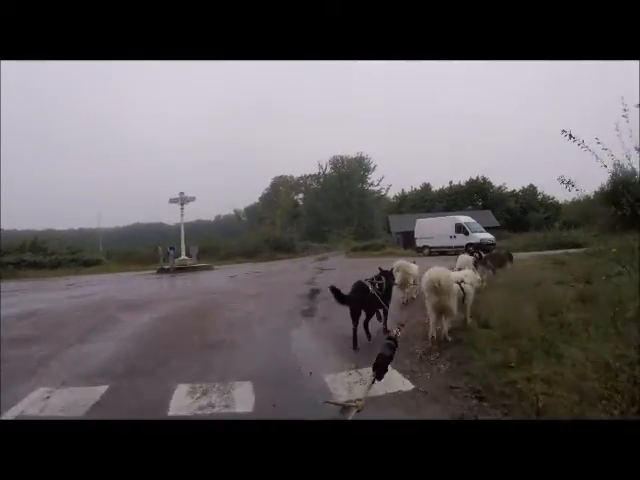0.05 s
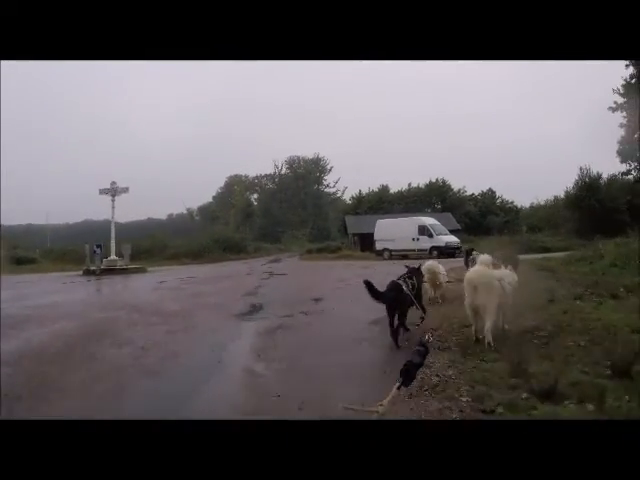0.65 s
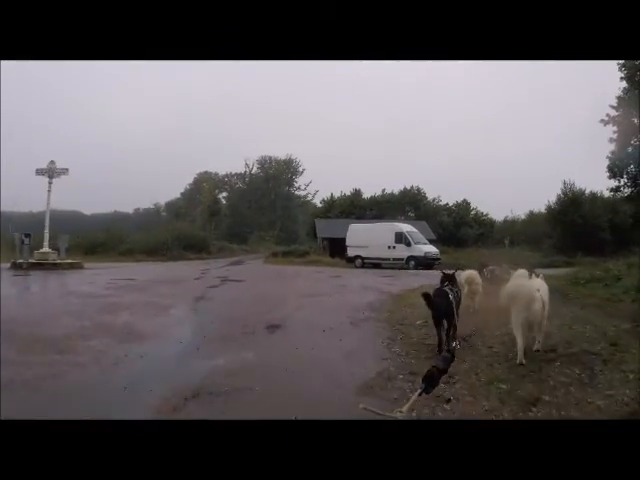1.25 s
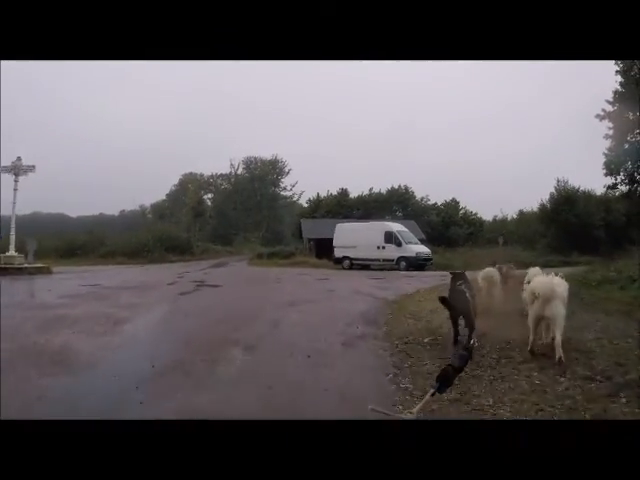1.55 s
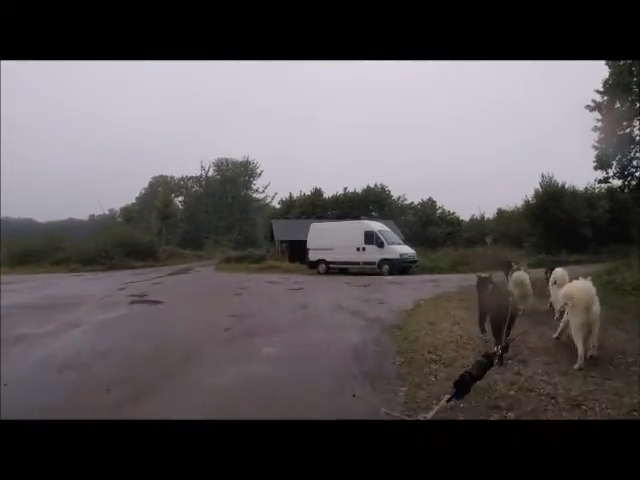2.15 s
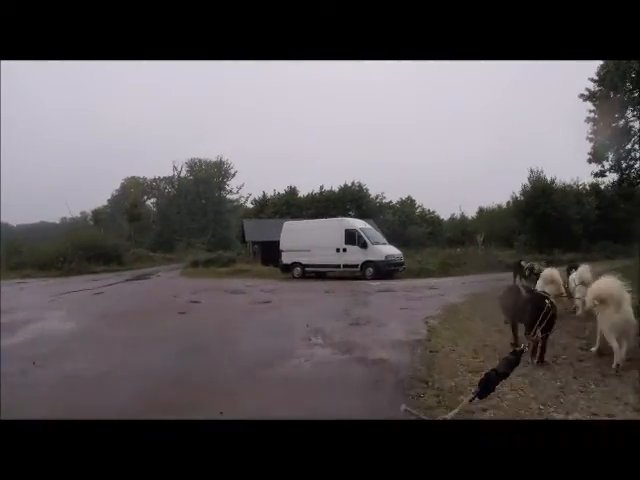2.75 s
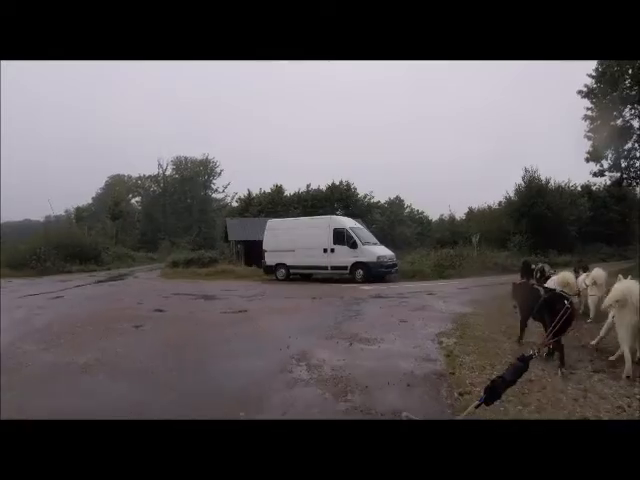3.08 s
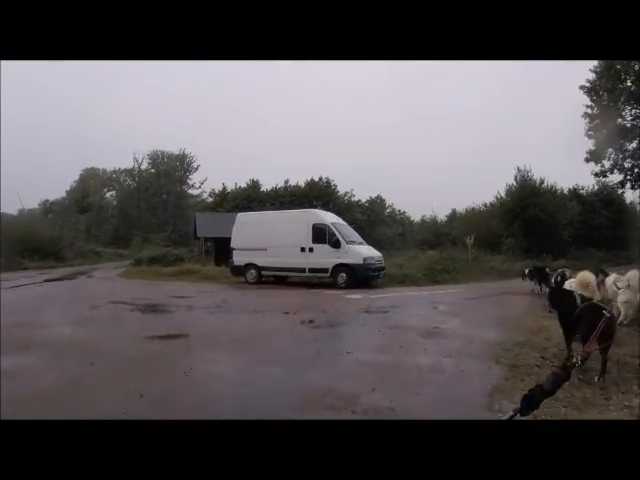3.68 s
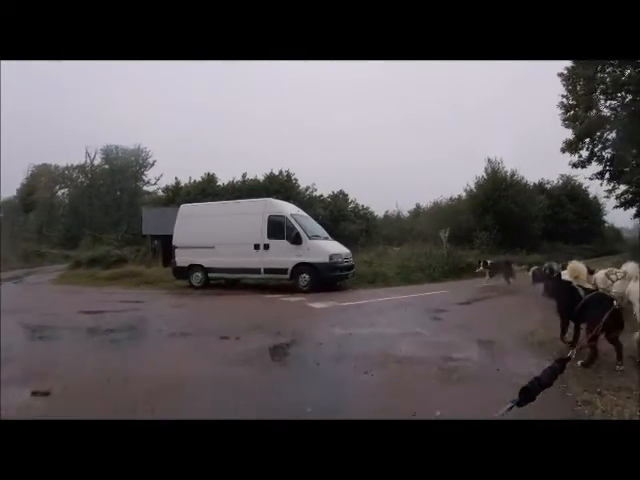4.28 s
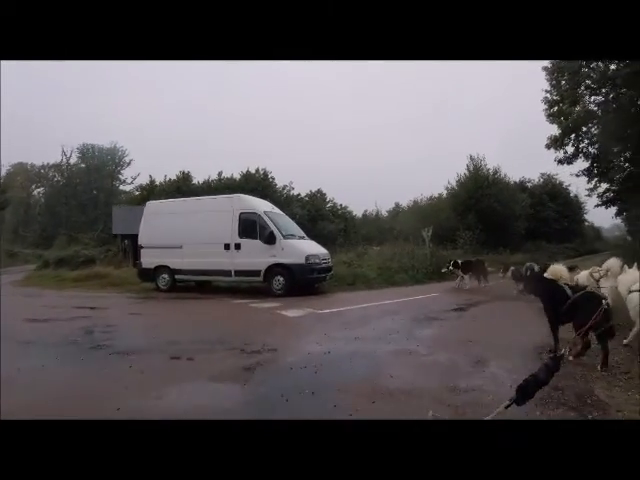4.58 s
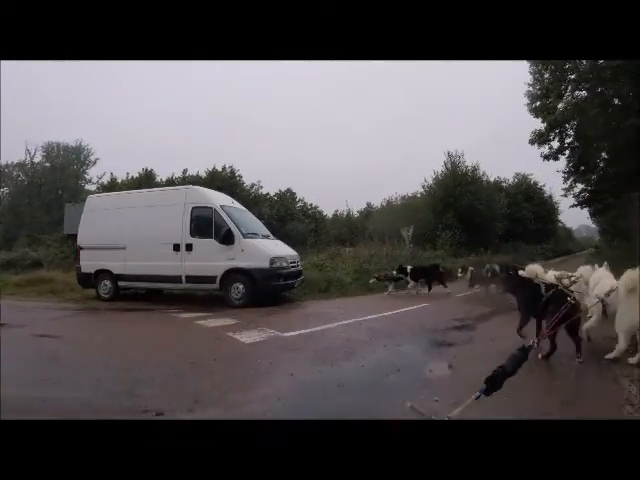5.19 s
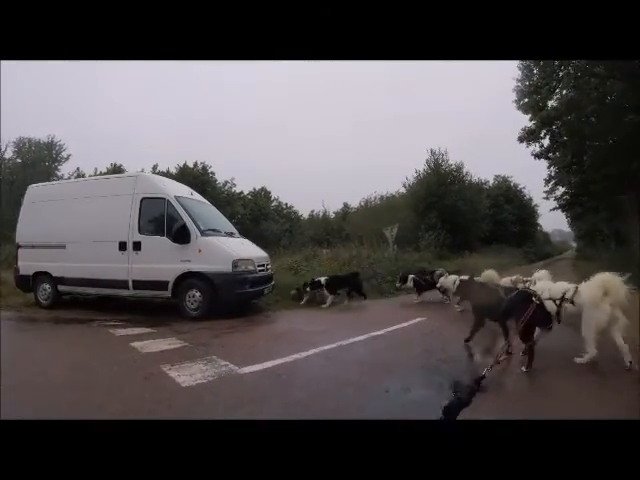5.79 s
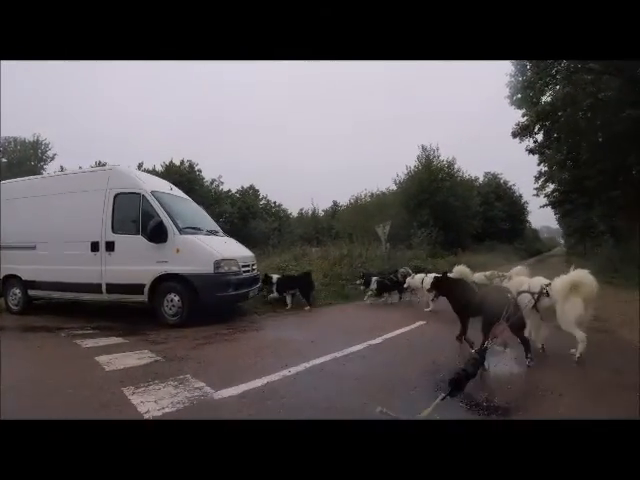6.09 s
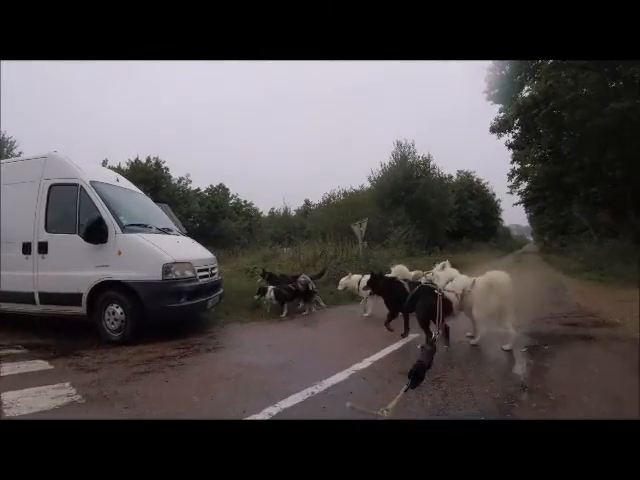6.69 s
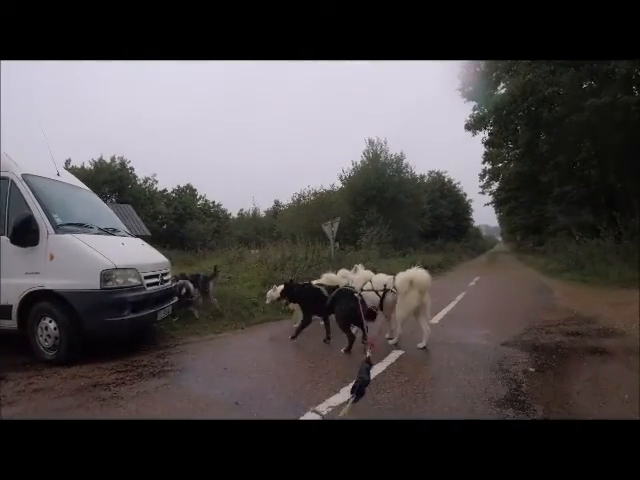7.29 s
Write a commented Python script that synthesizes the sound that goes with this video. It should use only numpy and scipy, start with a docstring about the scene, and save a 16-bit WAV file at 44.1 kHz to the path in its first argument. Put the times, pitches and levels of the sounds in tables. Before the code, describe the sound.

Heard close up from on board, a rolling cart throbs deeply and rattles throughout on a wet outdoor road. Bumps make its loose joints knock and clank, often in quick clusters, and its body occasionally booms. Just below, wheels and dogs' paws crunch through damp grit with sharp stone clicks and a fine hiss. Later the ride gets smoother, with a faint spatter of water and some last hard knocks.

```python
"""A deep throb and a rattling frame, close up: the microphone rides on a training cart that a dog team
pulls along the gritty edge of a wet road. The tyres shake the frame into the throb, road bumps keep it
rumbling, and jolts make loose joints knock and clank and the body boom. Just below, wet grit crunches
and snaps under wheels and paws; near the end, droplets spatter off bare tarmac."""
import sys
import numpy as np
from scipy import signal
from scipy.fft import rfft, irfft
from scipy.io import wavfile
from scipy.ndimage import uniform_filter1d, minimum_filter1d

SR = 44100
rng = np.random.default_rng(int(sys.argv[2]) if len(sys.argv) > 2 else 0)


def transcribe(signal):
    """Save signal, clipped to [-1, 1], as a 16-bit WAV file at the path in sys.argv[1]."""
    frames = np.atleast_2d(signal).T
    limited = np.clip(frames, -1, 1)
    pcm = np.round(limited * 32767).astype(np.int16)
    wavfile.write(sys.argv[1], SR, pcm)


N = 328280
TIME = np.arange(N) / SR

# ground under the wheels: time_s, crunch_db, spray_db
GROUND = [(0.42, -44, -61.5), (1.33, -33, -54), (1.7, -41.5, -59), (2.07, -40.5, -56), (2.47, -41, -63.5),
          (3.33, -38, -59), (3.79, -44, -60), (4.06, -37.5, -58.5), (4.26, -45, -61.5), (4.57, -37, -59.5),
          (5.26, -49, -62), (6.14, -43, -58), (7.05, -42, -61), (7.38, -44, -60)]
# spectrum of a stone's bright tick: frequency_hz, level_db
TICK_SPECTRUM = [(800, -30), (2500, -11.5), (4800, 9), (6700, 6), (8200, -4.5), (11000, -5), (12200, -19.5),
                 (13500, -12), (15000, -30.5)]
# spectrum of a stone's low crack: frequency_hz, level_db
CRACK_SPECTRUM = [(400, -16.5), (1200, 8), (2000, 3.5), (2800, -3), (3800, -7), (6000, -15), (11000, -43),
                  (14000, -82)]
# jolts that hit the frame: start_s, soft_db, hard_db, ring_db (relative to hard_db)
JOLTS = [(0.3468, 3, 11.5, -8), (0.785, 18, -1, 1), (1.181, 16.5, 7, -5), (1.2745, 19, 1, -20),
         (1.3092, 12, 3, -17), (1.5259, -7, 8.5, -19), (1.7047, -4, 9, 5), (1.91, 17.5, 1.5, 11),
         (1.9649, 18.5, 8, -4), (2.2868, 9, 6, 5), (2.5105, 12.5, 10, -9), (3.062, 14, -11, -15),
         (3.2233, 18.5, 9.5, 1), (3.4239, 1, -8, -12), (3.5818, -1, 5, 9.5), (3.7958, 12.5, -14, 3),
         (3.888, 13, 7, -1), (4.0338, 12.5, 0.5, 13), (4.112, 10, 8.5, 2), (4.2601, 12, 3, -10),
         (4.3135, -9, 7.5, -30), (4.4187, 17, 10, -20), (4.4434, 6, -2, 7), (5.3146, 12.5, 5, 12),
         (5.6385, 0, 4, 8), (5.786, 17, 2, 6), (5.8835, 8, 0.5, 8), (6.0435, -5, 5.5, -15),
         (6.1588, 12, 2.5, -6), (6.2314, 19, 2, -4), (6.249, 14, 9, -24), (6.7467, 12.5, 14.5, -18),
         (6.7884, 13, 10.5, -4), (6.8006, -10, 7.5, -5), (7.0675, 10, 0, -2)]
# ring of the frame: pitch_hz, t60_s, level_db
FRAME_MODES = [(181, 0.12, 0.5), (228.7, 0.18, 6), (259, 0.16, -10), (342.4, 0.19, -9), (416.8, 0.11, 5),
               (538.8, 0.091, 6), (623, 0.028, 1.5), (1058, 0.15, -21)]
# ring of a loose fitting: pitch_hz, t60_s, level_db
FITTING_MODES = [(1037, 0.028, -4), (1165, 0.031, -6.5), (1332, 0.023, -6.5), (1384, 0.043, -6),
                 (1518, 0.046, -6)]
# deep ring of the cart's body: pitch_hz, t60_s, level_db
BODY_MODES = [(176.6, 0.21, -6.5), (232.2, 0.37, -3.5), (323, 0.14, 2)]


def amp(db):
    """Decibels to gain."""
    return 10 ** (np.asarray(db) / 20)


def unit(x):
    """Scales to an rms of 1."""
    return x / np.sqrt(np.mean(x ** 2) + 1e-20)


def curves(rows):
    """One curve for each column after the time, with a value for every sample."""
    time_s, *columns = np.transpose(rows)
    return [np.interp(TIME, time_s, column) for column in columns]


def add(mix, start_s, sound):
    """Mixes a sound in at start_s."""
    part = mix[max(round(start_s * SR), 0):][:len(sound)]
    part += sound[:len(part)]


def wander(rate_hz):
    """Smooth random drift of rms 1, mostly slower than rate_hz."""
    hz = np.fft.rfftfreq(N, 1 / SR)
    return unit(irfft(rfft(rng.standard_normal(N)) * np.exp(-(hz / rate_hz) ** 2), N))


def colour(x, spectrum, size=4096):
    """Minimum-phase filter of energy 1 with the given spectrum: clicks keep their sharp front."""
    hz, db = np.transpose(spectrum)
    bin_hz = abs(np.fft.fftfreq(size, 1 / SR))
    log_gain = np.log(amp(np.interp(np.log(bin_hz + 1), np.log(hz), db)))
    response = np.fft.ifft(np.exp(np.conj(signal.hilbert(log_gain)))).real[:size // 2]
    return signal.oaconvolve(x, response / np.linalg.norm(response))[:len(x)]


def impacts(per_s, spread_db):
    """Random clicks of either sign, mostly small and a few large."""
    size = amp(spread_db * np.minimum(rng.exponential(1, N), 4))
    return size * rng.choice([-1, 1], N) * (rng.random(N) < per_s / SR)


def steady(x, span_s):
    """Holds the rms near 1 over span_s and keeps the faster grain."""
    span = int(span_s * SR)
    power = uniform_filter1d(uniform_filter1d(x ** 2, span), span)
    return x / np.sqrt(abs(power) + 1e-12)


def resonate(force, modes, top_hz):
    """A force rings a part's dying modes; its rubbery mount rolls off the sound above top_hz."""
    t = TIME[:SR // 3]
    ring = sum(amp(db - 60 * t / t60_s) * np.sin(2 * np.pi * hz * t) * (-1) ** k
               for k, (hz, t60_s, db) in enumerate(modes))
    ring = signal.sosfilt(signal.butter(5, top_hz, fs=SR, output="sos"), ring)
    return signal.oaconvolve(force, ring / np.linalg.norm(ring))[:N]


def padded_blows(blows, modes, focus_octaves, contact_s):
    """Each blow builds over the contact time, favours the mode nearest its pitch and is tuned to it."""
    t, out = TIME[:SR // 4], np.zeros(N)
    hz, t60_s, mode_db = np.transpose(modes)[:, :, None]
    for start_s, peak_db, lead_hz in blows:
        ratio = hz / hz[np.argmin(abs(hz - lead_hz))]
        share = 1 / np.hypot(1, np.log2(ratio) / focus_octaves)
        partials = share * amp(mode_db - 60 * t / t60_s) * np.sin(2 * np.pi * lead_hz * ratio * t)
        ring = partials.sum(0) * (1 - np.exp(-(t / contact_s) ** 2))
        add(out, start_s - contact_s / 2, amp(peak_db) * ring / abs(ring).max())
    return out


def spatter(per_s, spread_db):
    """Paws and tyres fling droplets off the wet tarmac."""
    # the team reaches bare tarmac: time_s, level_db
    puddles = [(6.2, -87), (6.6, -58), (7.4, -61.5)]
    # spectrum of the droplets: frequency_hz, level_db
    droplet_spectrum = [(3500, -6.5), (4800, 0), (10500, -11.5), (11800, -19), (15000, -24.5)]
    level_db, = curves(puddles)
    return amp(level_db) * unit(colour(impacts(per_s, spread_db), droplet_spectrum))


def chips(per_s, spread_db, tick_db, crack_db):
    """Small stones click at random, louder where the ground is gritty."""
    grit_db, _ = curves(GROUND)
    snaps = amp(grit_db) * impacts(per_s, spread_db)
    return amp(tick_db) * colour(snaps, TICK_SPECTRUM) + amp(crack_db) * colour(snaps, CRACK_SPECTRUM)


def grit_levels(crunch_db, spray_db, rise_share=0.46):
    """Crunch and spray in dB: the ground's running share plus a swell for each scuff."""
    # a wheel or paw scuffs through wet grit: start_s, length_s, crunch_db, spray_db
    scuffs = [(0.588, 0.14, -49, -70), (1.102, 0.13, -42, -58), (1.242, 0.086, -40.5, -56),
              (1.723, 0.12, -43.5, -59), (2.402, 0.084, -58, -50.5), (3.219, 0.1, -46, -51),
              (3.483, 0.13, -48, -49), (3.569, 0.071, -42.5, -56), (3.857, 0.089, -51, -46.5),
              (4.063, 0.058, -40.5, -48), (4.207, 0.072, -43, -51), (5.105, 0.039, -56, -48.5),
              (5.89, 0.09, -67, -46.5), (6.566, 0.16, -53, -61), (6.947, 0.13, -45, -64),
              (7.079, 0.096, -50, -55), (7.191, 0.051, -43.5, -52.5), (7.341, 0.11, -48.5, -58)]
    power = amp(np.array(curves(GROUND)) + [[crunch_db], [spray_db]]) ** 2
    for start_s, length_s, *levels_db in scuffs:
        swell = np.interp(np.arange(0, length_s, 1 / SR), [0, rise_share * length_s, length_s], [0, 1, 0])
        for layer, db in zip(power, levels_db):
            add(layer, start_s, (amp(db) * np.sin(np.pi / 2 * swell)) ** 2)
    return 10 * np.log10(power)


def grit_clumps(per_s, decay_s, bed):
    """Strength of grit bursting from under the tread: sudden, dying clumps over a steady bed."""
    power = signal.lfilter([1], [1, -np.exp(-1 / (decay_s * SR))], impacts(per_s, spread_db=3.0) ** 2)
    return np.sqrt(bed + power / power.mean())


def grains(low_hz, high_hz, spread_db, cycles, count):
    """Single grains of grit, each dying within a few cycles of its own pitch."""
    t, out = TIME[:SR // 60], np.zeros(N)
    for when, pitch, size in rng.random((count, 3)):
        hz = low_hz * (high_hz / low_hz) ** pitch
        db = spread_db * min(-np.log(size), 4)
        add(out, when * TIME[-1], amp(db) * np.sin(2 * np.pi * hz * t) * np.exp(-t * hz / cycles))
    return out


def mottle(x, depth_db, width_hz, length_s):
    """Every wet splat has its own colour: random patches of the spectrum stand out and sink again."""
    hz, t, spectra = signal.stft(x, SR, nperseg=256, noverlap=192)
    patches = rng.standard_normal(spectra.shape[::-1])
    for _ in range(2):
        patches = uniform_filter1d(patches, max(round(length_s / t[1]), 1), axis=0)
        patches = uniform_filter1d(patches, max(round(width_hz / hz[1]), 1), axis=1)
    gain = unit(amp(depth_db * unit(patches)))
    return signal.istft(spectra * gain.T, SR, nperseg=256, noverlap=192)[1][:N]


def wet_grit():
    """Grains are crushed in clumps and click apart, and the wet tread sprays fine droplets."""
    # spectrum of crushed grit: frequency_hz, level_db
    crunch_spectrum = [(300, -14.5), (750, 11.5), (1100, 8.5), (1500, 5.5), (1800, 3), (2600, -6),
                       (3600, -16.5), (6000, -38.5), (11000, -50.5), (14000, -80.5)]
    # spectrum of the fine gritty hiss, with the top treble cut off above 11 kHz: frequency_hz, level_db
    hiss_spectrum = [(800, -9.5), (2500, 7.5), (3800, 0), (4800, 4), (6500, 0.5), (8000, -4.5), (10800, -9),
                     (11600, -27), (14500, -39.5)]
    crunch_db, spray_db = grit_levels(crunch_db=-10.5, spray_db=2.5)
    clumps = grit_clumps(per_s=65, decay_s=0.0068, bed=0.84)
    coarse = colour(impacts(per_s=1300, spread_db=1.0) * clumps * amp(3.0 * wander(50)), crunch_spectrum)
    fine = colour(impacts(per_s=3000, spread_db=1.0) * clumps, hiss_spectrum)
    pebbles = grains(low_hz=1000, high_hz=2920, spread_db=5.0, cycles=3.1, count=1200)
    sand = grains(low_hz=3300, high_hz=11000, spread_db=3.5, cycles=2.5, count=1300)
    crunch = amp(7.5) * steady(coarse, span_s=0.2) + amp(-2.5) * steady(pebbles, span_s=0.53)
    spray = steady(fine, span_s=0.34) + amp(-7.5) * steady(colour(sand, hiss_spectrum), span_s=0.39)
    crunch = mottle(crunch, depth_db=2.5, width_hz=500, length_s=0.012)
    spray = mottle(spray, depth_db=3.0, width_hz=450, length_s=0.01)
    return amp(crunch_db) * crunch + amp(spray_db) * spray


def stones(crumble_s, tick_db, crack_db, ring_gain):
    """A stone snaps and its wet crumbs scatter for milliseconds, ringing at a pitch of their own."""
    # snapping stones: start_s, tick_db, crack_db, crumbs_db (relative to the snap)
    snaps = [(0.079, -38, -21.5, 3), (0.158, -46, -22, 13), (0.186, -35, -29, 5), (0.343, -36, -18, -3),
             (0.5717, -36, -23.5, -5), (0.758, -36, -22, 14), (0.7895, -38, -18, 12), (0.906, -40, -25, 10),
             (0.9303, -36, -33, 0), (0.99, -38, -28, 10), (1.105, -27.5, -21, 0), (1.1247, -40, -21, -19),
             (1.362, -35, -25, 12), (1.1548, -27.5, -16, 0), (1.3828, -27, -20.5, 7),
             (1.4345, -29, -17.5, 10), (1.525, -29, -15.5, 8), (1.554, -33, -26, 3), (2.0535, -37, -28, 4),
             (1.8786, -38, -26.5, 5), (2.0846, -44, -31, -18), (2.115, -47, -25, -8),
             (2.1304, -32, -31, -16), (2.166, -37, -26, 8), (2.247, -47, -29, 0), (2.8244, -33, -20.5, 6),
             (2.8503, -32, -18.5, 12), (3.055, -36, -20.5, -3), (3.2161, -27.5, -15.5, 1),
             (3.2519, -27, -27, -11), (3.29, -36, -18, 7), (3.421, -37, -22, 9), (3.4765, -32.5, -40, 4),
             (3.6112, -38, -28, 2), (3.624, -39, -23, -1), (3.713, -40, -23, 11), (3.87, -28.5, -19.5, -9),
             (3.9192, -40, -27, -1), (3.961, -43, -18.5, 0), (4.066, -42, -33, 11), (4.1465, -33.5, -24, 6),
             (4.178, -31, -28, -5), (4.388, -41, -21, -7), (4.474, -32, -11.5, -1), (4.486, -28, -17.5, -4),
             (4.609, -49, -28, 7), (5.149, -35, -36, -17), (5.337, -47, -23.5, 15), (5.379, -47, -30, -6),
             (5.623, -27.5, -22, -4), (5.8276, -48, -24.5, 1), (5.9174, -40, -34, -4),
             (5.9583, -29, -25, 13), (6.043, -47, -27, 5), (6.2374, -40, -21, 3), (6.4296, -37, -22.5, 9),
             (6.6952, -32.5, -36, -13), (7.064, -46, -23.5, 10), (7.1541, -37, -30, 2),
             (7.399, -34, -36, 3)]
    t = TIME[:SR // 20]
    tick, crack = np.zeros((2, N))
    pitches_hz = rng.uniform([1400, 4500], [3200, 11000], (len(snaps), 2))  # crack, tick
    noises = rng.standard_normal((len(snaps), 2, len(t)))
    for (start_s, high_db, low_db, crumbs_db), noise, pair_hz in zip(snaps, noises, pitches_hz):
        scatter = noise * abs(noise) * t ** .25 * np.exp(-t / crumble_s)
        crumbs = amp(crumbs_db) * scatter / np.linalg.norm(scatter, axis=1, keepdims=True)
        bursts = ((t == 0) + crumbs) / np.hypot(1, amp(crumbs_db))  # click and crumbs share energy 1
        for layer, db, burst, hz in zip((crack, tick), (low_db, high_db), bursts, pair_hz):
            ring = signal.lfilter(*signal.iirpeak(hz, Q=12, fs=SR), burst)
            add(layer, start_s, amp(db) * (burst + ring_gain * ring))
    return amp(tick_db) * colour(tick, TICK_SPECTRUM) + amp(crack_db) * colour(crack, CRACK_SPECTRUM)


def rattle_level(road_db, climb_s=0.004, settle_s=0.038, soft_stir_db=-31, ring_stir_db=-29):
    """Level of the rattle in dB: the road's own roughness, stirred up after each jolt."""
    # bumpiness of the road: time_s, level_db
    road = [(0.1, -20), (0.91, -18.5), (1.33, -16.5), (1.49, -19), (2.54, -19.5), (2.77, -18), (3.9, -20),
            (4.72, -22), (4.88, -20), (5.35, -21.5), (6.22, -27), (6.4, -28), (7.27, -28), (7.35, -31.5)]
    rough_db, = curves(road)
    power, t = amp(rough_db + road_db) ** 2, TIME[:SR // 2]
    stir = (1 - np.exp(-t / climb_s)) * np.exp(-t / settle_s)
    for start_s, soft_db, hard_db, ring_db in JOLTS:
        strength = np.hypot(amp(soft_db + soft_stir_db), amp(hard_db + ring_db + ring_stir_db))
        add(power, start_s, (strength * stir) ** 2)
    return 10 * np.log10(power)


def flex(x, depth, rate_hz):
    """The frame flexes under its load, so its ring drifts in pitch by about the share depth."""
    shift = depth * SR / (np.pi * rate_hz) * wander(rate_hz)
    return np.interp(np.arange(N) + shift, np.arange(N), x)


def dead_spot(x, hz, width_hz):
    """Between two of its modes the frame hardly moves at the microphone."""
    return signal.lfilter(*signal.iirnotch(hz, hz / width_hz, SR), x)


def rolling():
    """Bumps in the road drum on the frame and jiggle the loose fitting, over a low rumble."""
    # spectrum of a bump's thud: frequency_hz, level_db
    thud_spectrum = [(60, -26.5), (160, -18), (280, 10.5), (480, -2), (640, 1.5), (850, -10.5), (1300, -29),
                     (2200, -71.5)]
    # spectrum of the road rumble: frequency_hz, level_db
    rumble_spectrum = [(12, -19.5), (24, -6), (40, -5.5), (66, -0.5), (85, -3.5), (125, -8.5), (165, -12.5),
                       (260, -12.5), (500, -93)]
    rattle_db = rattle_level(road_db=0.5)
    force = impacts(per_s=420, spread_db=0.37) * amp(1.56 * wander(29))
    ring = flex(resonate(force, FRAME_MODES, top_hz=1400), depth=0.018, rate_hz=4.92)
    bumps = dead_spot(ring + amp(-3.5) * colour(force, thud_spectrum), hz=483.4, width_hz=18)
    jiggle = resonate(impacts(per_s=220, spread_db=4.0), FITTING_MODES, top_hz=1770)
    rumble = steady(colour(rng.standard_normal(N), rumble_spectrum), span_s=0.28)
    rattle = amp(-1) * steady(bumps, span_s=0.19) + amp(-26.5) * steady(jiggle, span_s=0.97)
    return amp(rattle_db) * rattle + amp(0.46 * rattle_db - 8.5) * rumble


def clanks(level_db):
    """The loose fitting hits its stop and rings briefly."""
    # hits on the stop: start_s, peak_db, pitch_hz
    hits = [(0.0785, -21, 1253), (0.1463, -20, 1030), (0.3215, -24, 1525), (0.3445, -16, 1250),
            (0.3495, -10.5, 1500), (0.7846, -17.5, 1003), (1.049, -21, 1450), (1.1727, -18, 1450),
            (1.2131, -13.5, 1000), (1.276, -13.5, 1060), (1.322, -19.5, 1490), (1.7846, -18, 1000),
            (1.946, -19.5, 1128), (2.163, -26.5, 1380), (3.055, -13, 966.4), (3.2807, -20, 1314),
            (3.4207, -16.5, 1060), (4.4443, -20, 1383), (5.1307, -26, 1370), (5.6426, -20, 1119),
            (5.7908, -25, 1380), (5.8275, -15, 1190), (5.8625, -26, 1466), (6.2325, -13, 1485),
            (6.2905, -29, 1403), (6.744, -16, 1057), (6.7622, -22, 1012)]
    return amp(level_db) * padded_blows(hits, FITTING_MODES, focus_octaves=0.13, contact_s=0.0014)


def clacks(level_db):
    """Two parts of the frame slap together and stop dead."""
    # slaps: start_s, level_db
    slaps = [(1.3086, -4), (3.0555, -9), (4.3138, -6), (4.4173, -1.5), (4.4435, -10), (6.2325, -2.5)]
    # their dry ring: pitch_hz, t60_s, level_db
    slap_modes = [(652, 0.031, 8), (844, 0.034, -1), (1050, 0.035, -4), (1450, 0.02, -19)]
    force = np.zeros(N)
    for start_s, db in slaps:
        add(force, start_s, [amp(db)])
    return amp(level_db) * resonate(force, slap_modes, top_hz=1650)


def knocks(thump_db, knock_db, body_to_frame_db, joint_to_frame_db):
    """A jolt is a soft push on the body and a hard blow on a slack joint; both set the frame ringing."""
    # hollow, quickly damped ring of the joint: pitch_hz, t60_s, level_db
    joint_modes = [(428, 0.044, 3.5), (535.4, 0.042, 6.5), (643, 0.033, 1), (880, 0.056, -12)]
    push, blow, carried = np.zeros((3, N))
    for start_s, soft_db, hard_db, ring_db in JOLTS:
        add(push, start_s, [amp(soft_db)])
        add(blow, start_s, [amp(hard_db)])
        add(carried, start_s, [amp(hard_db + ring_db)])
    thump = resonate(push, BODY_MODES, top_hz=705)
    knock = resonate(blow, joint_modes, top_hz=1060)
    carried_knock = resonate(carried, joint_modes, top_hz=1000)
    frame_force = amp(body_to_frame_db) * thump + amp(joint_to_frame_db) * carried_knock
    return amp(thump_db) * thump + amp(knock_db) * knock + resonate(frame_force, FRAME_MODES, top_hz=1220)


def booms(level_db):
    """The cart drops into a hollow and its whole body rings."""
    # drops: start_s, peak_db, pitch_hz
    drops = [(0.351, -4.5, 314), (1.277, -12, 275.5), (5.79, -11.5, 301.2), (6.233, -1, 333)]
    return amp(level_db) * padded_blows(drops, BODY_MODES, focus_octaves=0.6, contact_s=0.0051)


def throb(rows, jitter, flutter_db, octave_db):
    """A deep, slightly lopsided vibration, unsteady in rate and strength."""
    pitch_hz, level_db = curves(rows)
    phase = 2 * np.pi * np.cumsum(pitch_hz * (1 + jitter * wander(16.4))) / SR
    wave = unit(np.sin(phase) + amp(octave_db) * np.sin(2 * phase))
    return amp(level_db + flutter_db * wander(5.1)) * wave


def tyres():
    """The frame shakes on its tyres, and the tread hums lower still."""
    # shake of the frame: time_s, pitch_hz, level_db
    frame_shake = [(0.0, 53.1, -3.5), (0.28, 55.65, -21.5), (0.88, 47.74, -8.5), (1.64, 52.44, -12),
                   (2.04, 48.43, -11), (2.76, 55.86, -14), (2.92, 47.5, -8), (3.12, 50.24, -16),
                   (3.32, 49.5, -6), (3.52, 55.17, -20.5), (4.52, 47.77, -7), (4.68, 52.84, -11.5),
                   (5.08, 50.4, -9), (5.44, 50.96, -13), (5.68, 50.9, -8.5), (6.64, 52.78, -15.5),
                   (6.92, 52.2, -10.5), (7.44, 52.23, -12)]
    # hum of the tread: time_s, pitch_hz, level_db
    tread_hum = [(0.0, 37.48, -18), (1.4, 37.18, -20.5), (2.64, 37.2, -15.5), (3.0, 37.05, -21.5),
                 (3.84, 35.64, -14), (5.0, 35.76, -25.5), (7.44, 36.06, -26)]
    shake = amp(-4.5) * throb(frame_shake, jitter=0.0779, flutter_db=2.0, octave_db=-19.0)
    return shake + throb(tread_hum, jitter=0.03155, flutter_db=2.0, octave_db=-10.5)


def scene():
    """Everything that reaches the one microphone on the cart."""
    cart = tyres() + knocks(thump_db=-7.0, knock_db=1.0, body_to_frame_db=-28.5, joint_to_frame_db=-23.5)
    cart += clanks(level_db=-3.5) + clacks(level_db=11.0) + booms(level_db=-0.5)
    gravel = wet_grit() + stones(crumble_s=0.0055, tick_db=10.5, crack_db=10.5, ring_gain=1.12)
    gravel += chips(per_s=45, spread_db=1.5, tick_db=1.0, crack_db=8.5)
    return (cart + gravel + rolling() + spatter(per_s=1400, spread_db=2.5))[None]


def record(dry, ceiling=0.9, cutoff_hz=15600):
    """A quick limiter holds the peaks down, then a steep low-pass takes off the highest treble."""
    overload = np.maximum(abs(dry[0]) / ceiling, 1)
    gain = uniform_filter1d(minimum_filter1d(1 / overload, size=500), size=500)
    low_pass = signal.firwin(511, cutoff_hz, window=("kaiser", 9), fs=SR)
    return signal.oaconvolve(dry * gain, low_pass[None], "same")


dry = scene()
out = record(dry)
transcribe(out)
```